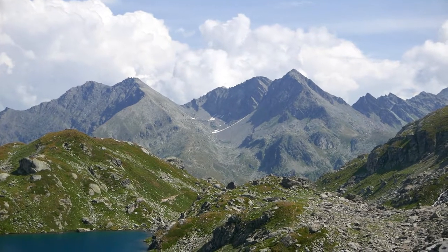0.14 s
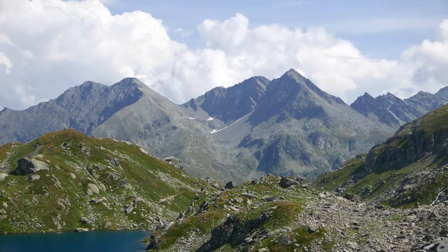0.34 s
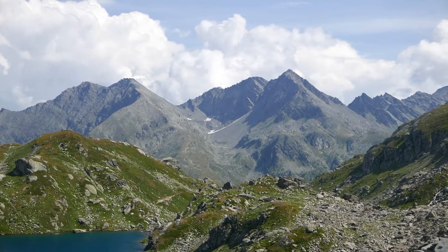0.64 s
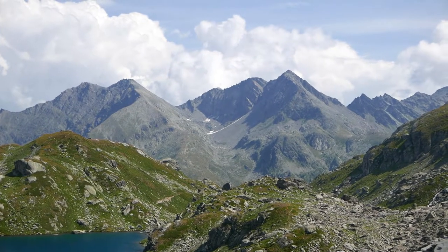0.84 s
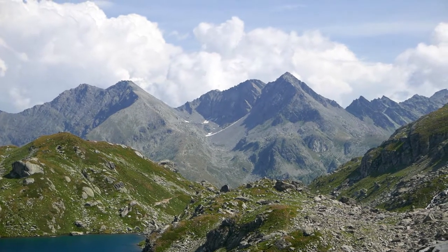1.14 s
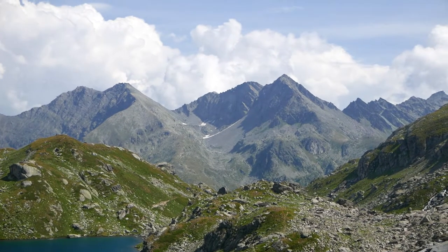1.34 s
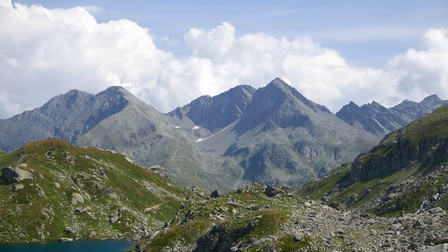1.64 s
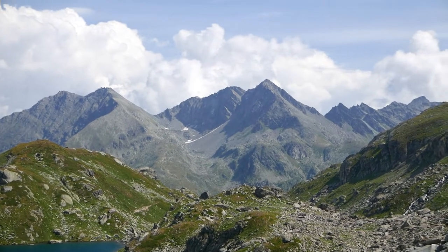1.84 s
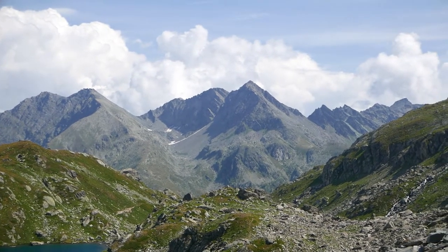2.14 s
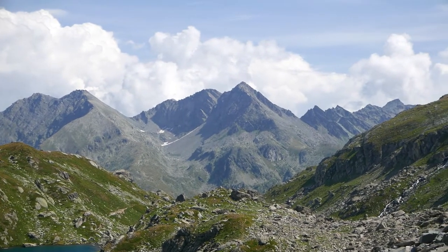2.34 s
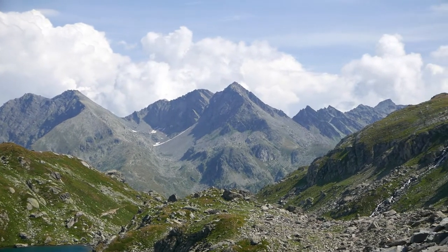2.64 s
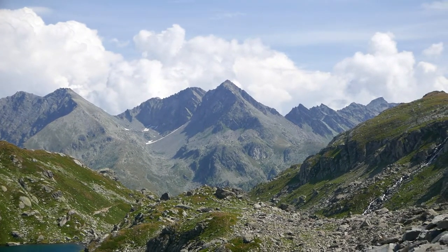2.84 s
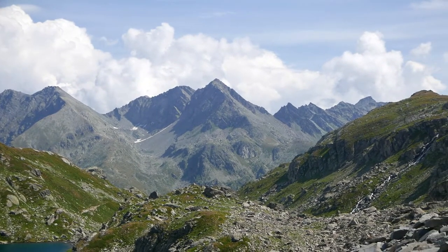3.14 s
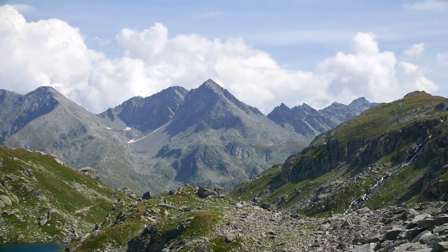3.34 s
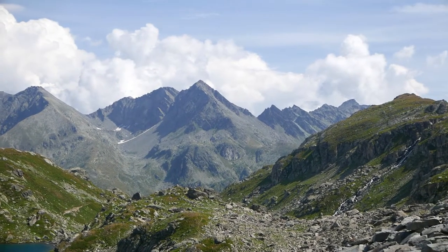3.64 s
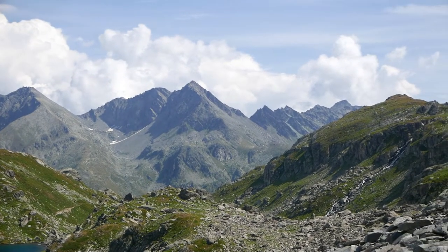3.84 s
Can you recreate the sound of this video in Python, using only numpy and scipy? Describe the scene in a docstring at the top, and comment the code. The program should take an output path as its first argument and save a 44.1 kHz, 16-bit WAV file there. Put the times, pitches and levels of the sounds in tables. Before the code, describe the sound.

Wind buffeting an open-air microphone in low irregular thumps over a steady distant mountain rush

```python
"""Distant wind and running water rush steadily across an open mountain basin, as flickering octave noise bands.
A thin electronic tone and a faint rumble lie beneath, and a lens motor ticks as short noise bursts.
Eddies thump singly on the left or right microphone port: brief low sines with overtones and turbulence.
The camera housing clicks near 0.3 s and 3.2 s, as ringing modes with a crack of noise."""
import sys
import numpy as np
from scipy import signal
from scipy.fft import rfft, irfft
from scipy.io import wavfile
from scipy.ndimage import uniform_filter1d

SR = 44100
rng = np.random.default_rng(int(sys.argv[2]) if len(sys.argv) > 2 else 0)


def decibels_to_gain(level_db):
    """Convert a level in decibels to a linear amplitude gain (20 dB per decade)."""
    exponent = np.asarray(level_db, float) / 20
    return 10 ** exponent


def log_audio(samples):
    """Write samples as a 16-bit WAV file to the path given in sys.argv[1]."""
    # one column per channel
    frames = np.atleast_2d(samples).T
    # limit to full scale, then quantise
    limited = np.clip(frames, -1, 1)
    pcm = np.round(limited * 32767).astype(np.int16)
    wavfile.write(sys.argv[1], SR, pcm)


N = 176400

# Spectrum of the distant rush, relative: f/Hz, level/dB per Hz
RUSH_SPECTRUM = [(25, -38), (60, -20), (100, -36), (180, -12), (280, -0.5), (420, -3.5), (700, -0.5),
                 (1000, -4.5), (1500, -6.5), (2000, -14), (2600, -14.5), (3600, -23.5), (5000, -29.5),
                 (7000, -25.5), (9500, -27), (12500, -29.5), (15700, -34.5)]
# Slow swell added to the rush level: t/s, level/dB
RUSH_SWELL = [(0, -1.5), (1.3, 0.5), (4, 0)]
# Share of the rush common to both sides: f/Hz, share/0-1
RUSH_LIKENESS = [(60, 0.7), (300, 0.96), (650, 0.85), (1300, 0.47), (3000, 0.43), (7000, 0.31),
                 (15000, 0.6)]
# Balance of the rush, left over right: f/Hz, level/dB
RUSH_BALANCE = [(200, -0.5), (400, -1.5), (700, -3.5), (1290, 1.5), (2380, 4.5), (4400, 2), (8100, 0),
                (15000, 0)]
# Phase lead of the left side in the common rush: f/Hz, phase/rad
RUSH_LEAD = [(300, 0.087), (1380, 0.8), (2410, 0.37), (5000, .1)]
# Weak flutter on both ports, around which each port wavers: t/s, level/dB
FLUTTER = [(0, -60), (.36, -50), (.44, -65), (.6, -71.5), (1.2, -71), (1.3, -61), (2.2, -57.5),
           (3.3, -47.5), (3.37, -60), (3.45, -42.5), (3.63, -52.5), (4, -61)]
# Motor ticks, before the stereo balance: t/s, peak level/dB
TICKS = [(0.0643, -52), (0.104, -41.5), (0.2247, -49.5), (0.383, -45), (0.4271, -45.5), (0.5842, -45.5),
         (0.6649, -53), (0.7036, -41), (0.9037, -44.5), (0.9807, -44), (1.023, -45.5), (1.0645, -51),
         (1.105, -42), (1.1852, -46), (1.2251, -46), (1.305, -48), (1.3865, -46), (1.584, -48),
         (1.6701, -50), (1.712, -54), (1.7833, -46.5), (1.9043, -47), (2.164, -48), (2.205, -55)]
# Tone colour of a tick, relative: f/Hz, level/dB per Hz
TICK_COLOUR = [(1900, -25), (2600, 7.5), (3300, -5), (4500, -0.5), (5700, -8.5), (7500, -30)]
# Eddies, before the low cut: t/s, peak level/dB, mean f/Hz, length/ms, port/0 left 1 right
EDDIES = [(0.106, -29, 202.6, 13.4, 0), (0.227, -32, 225, 7.1, 0), (0.235, -32, 206, 13.6, 1),
          (0.259, -40, 177.4, 24, 0), (0.355, -24.5, 185, 10.3, 0), (1.261, -34, 200.6, 23, 0),
          (1.374, -31, 172, 10, 0), (1.396, -8.5, 273, 8.3, 0), (1.422, -24, 221, 41, 1),
          (1.447, -18.5, 195, 13.5, 1), (1.45, -17, 213, 8.5, 0), (1.465, -20.5, 300, 7.3, 0),
          (1.499, -19.5, 232.2, 8.9, 0), (1.518, -30, 241, 15, 0), (1.533, -24, 250, 8.6, 0),
          (1.554, -20, 282, 8.7, 0), (1.565, -36, 190, 7.3, 0), (1.634, -35.5, 179.5, 20, 0),
          (1.657, -28, 193, 18, 1), (1.703, -37, 191, 21, 1), (1.755, -17, 231.6, 7, 0),
          (1.798, -27.3, 206, 16, 0), (1.848, -29.5, 177.6, 16, 0), (1.868, -27, 195.4, 6.6, 1),
          (1.917, -24.5, 202.3, 25, 1), (1.939, -27, 184.7, 12, 1), (1.975, -27.9, 191, 15, 0),
          (2.074, -21, 175.1, 10.7, 0), (2.084, -35, 137.6, 19, 1), (2.146, -37, 177, 27, 1),
          (2.147, -36, 175, 25, 0), (2.234, -30.5, 183.3, 14, 1), (2.304, -23.5, 210.7, 10.6, 0),
          (2.307, -31.5, 283, 15, 1), (2.371, -22.5, 194, 8.6, 0), (2.38, -23.5, 189, 6.7, 1),
          (2.395, -36, 152, 23, 0), (2.416, -31, 217.6, 7.2, 0), (2.425, -35, 200.3, 52, 1),
          (2.472, -23, 191.3, 12, 1), (2.533, -24, 161, 37, 1), (2.595, -24.5, 241, 11.4, 1),
          (2.604, -30, 215, 36, 1), (2.66, -23, 198.8, 12, 0), (2.689, -14, 222, 10.6, 0),
          (2.7, -27.5, 199.5, 16, 1), (2.791, -23, 172.9, 20, 1), (2.828, -33, 230, 15, 0),
          (2.838, -24, 180, 14, 1), (2.935, -38.5, 175.5, 20, 0), (3.006, -21, 205.7, 14.7, 0),
          (3.042, -28, 218, 22, 0), (3.166, -34.5, 138, 11, 0), (3.19, -35, 192, 38, 1),
          (3.246, -17, 233.4, 19.6, 0), (3.251, -20.5, 219.9, 20, 1), (3.272, -33, 202.4, 53, 1),
          (3.301, -17.5, 199.4, 11, 0), (3.434, -27.5, 274, 7.2, 0), (3.467, -21, 174.2, 21, 0),
          (3.477, -11, 217, 5, 1), (3.533, -31.5, 224, 15.9, 0), (3.546, -11.5, 292.9, 15.4, 1),
          (3.595, -26, 184.2, 8.1, 0), (3.601, -22, 259, 11, 1), (3.704, -29.5, 194, 9.4, 0),
          (3.727, -14, 225.4, 11, 0), (3.784, -13, 212, 7.6, 0), (3.806, -12, 191.9, 15, 0),
          (3.814, -20, 216, 63, 1), (3.846, -22.5, 193, 36, 0), (3.902, -31.5, 220.2, 19, 0),
          (3.936, -36, 233.5, 12, 0)]
# Spectrum of port turbulence, relative: f/Hz, level/dB per Hz
TURBULENCE_SPECTRUM = [(40, -9), (70, -9.5), (110, 3), (200, 1.5), (300, -4), (420, -9.5), (700, -33),
                       (1200, -42), (2500, -80)]
# Housing clicks: t/s, ring peak level/dB, crack peak level/dB, crack top f/Hz
CLICKS = [(0.266, -51, -48, 6000), (0.2845, -35.5, -38, 15500), (0.292, -45, -48, 9000),
          (0.2975, -49, -50, 5000), (3.217, -34.5, -42.5, 7000)]
# Ringing modes of the housing, before each hit's scatter: f/Hz, relative level/dB, t60/s
CLICK_MODES = [(1800, -14, .008), (2400, -8, .012), (2850, 0, .011), (2750, -16, .07), (3300, -8, .008)]
# Tone colour of a click's crack, relative: f/Hz, level/dB per Hz
CRACK_COLOUR = [(2200, -30), (3200, -4), (4900, 0), (6500, -8), (9000, -6), (11000, -17), (13300, -10)]
# Narrow dips of the microphone path: centre f/Hz, half-width to 1/e of depth f/Hz, level/dB
DIPS = [(471.3, 30.5, -13.5), (6720, 120, -9.5), (7390, 226, -13.5), (7830, 236, -14.5), (8530, 290, -10)]

RUSH_DB, FLICKER_DB, FLICKER_RATE_HZ = -49, 1.13, 9.18  # rms before swell; spread and rate per octave
WHINE_HZ, WHINE_DB, WHINE_WANDER_DB = 15625, -93, 3.0
RUMBLE_DB, RUMBLE_KNEE_HZ = -80, 35
FLUTTER_DEPTH_DB = 6.5
TICK_T60_S, TICK_LEFT_DB = 0.012, 1
BURST_RISE_S = .001  # onset of ticks and cracks
EDGE_DB, RISE_SHARE = -19.5, 0.97  # fall at an eddy's ends; rise length over fall length
WANDER = .06  # spread of the eddy pitch, as a share
SKIRT_DB, SKIRT_SLOPE, SKIRT_KNEE_DB = -33, .8, -20  # turbulence; its dB per dB of eddy below the knee
SKIRT_RISE_MS, SKIRT_MS, GRAIN_DB = 6.1, 11, 3.1  # time constants in and out; spread of the grain
SNAP_DB, SNAP_HZ, SNAP_TOP_HZ, SNAP_MS = 8, 400, 800, 10  # overtone gain, band, length that halves the drive
WIND_CUT_HZ, CUT_FLOOR_DB, PORT_LEAK_DB = 76.6, -35.5, -13.5  # low cut, what bypasses it, leak across
CLICK_MS, CLICK_SCATTER_DB, CLICK_DETUNE = 2.2, 2, .02  # contact time; spread of mode levels and tuning
CRACK_T60_S = .016


def read(table, hz):
    """Table value on a log-frequency axis."""
    f, v = np.array(table, float).T
    return np.interp(np.log(np.maximum(hz, 1)), np.log(f), v)


def colour(x, gain):
    """Filter by a gain that depends on frequency."""
    return irfft(rfft(x) * gain(np.fft.rfftfreq(N, 1 / SR)), N)


def unit(x):
    """Scale to rms 1."""
    return x / np.sqrt(np.mean(x ** 2))


def walk(rate):
    """Random levels held 1 / rate s and slewed twice; spread 1."""
    hold = int(SR / rate)
    steps = np.repeat(rng.standard_normal(N // hold + 1), hold)
    return unit(uniform_filter1d(uniform_filter1d(steps, hold), hold)[:N])


def curve(table):
    """Control curve in time."""
    return np.interp(np.arange(N) / SR, *np.array(table, float).T)


def noise_bursts(rows, spectrum, t60_s):
    """A short burst of coloured noise at every row (t/s, level/dB, top f/Hz), a little unlike left and right."""
    t, out = np.arange(2048) / SR, np.zeros((2, N))
    hz = np.fft.rfftfreq(len(t), 1 / SR)
    shape = np.minimum(t / BURST_RISE_S, 1) * decibels_to_gain(-60 * t / t60_s)
    for (s, db, top_hz), noise in zip(rows, rng.standard_normal((len(rows), 3, len(t)))):
        stereo = noise[0] + noise[1:] / 2
        gain = decibels_to_gain(read(spectrum, hz)) / (1 + (hz / top_hz) ** 10)
        burst = shape * irfft(rfft(stereo) * gain)
        start = int(s * SR)
        out[:, start:start + len(t)] += decibels_to_gain(db) * burst / abs(burst).max()
    return out


def rush():
    """Distant wind and water: octave noise bands with a slight flicker, partly alike left and right."""
    hz, out = np.fft.rfftfreq(N, 1 / SR), 0
    common, left_own, right_own = rfft(rng.standard_normal((3, N)))
    like = np.clip(read(RUSH_LIKENESS, hz), 0, 1)
    half_lead = np.exp(.5j * read(RUSH_LEAD, hz))
    half_balance = decibels_to_gain(read(RUSH_BALANCE, hz) / 2)
    left = (np.sqrt(like) * common * half_lead + np.sqrt(1 - like) * left_own) * half_balance
    right = (np.sqrt(like) * common / half_lead + np.sqrt(1 - like) * right_own) / half_balance
    both = np.array([left, right]) * decibels_to_gain(read(RUSH_SPECTRUM, hz))
    octave = np.log2(hz + 1)
    for centre in range(4, 15):
        share = np.cos(np.pi / 2 * np.clip(octave - centre, -1, 1))
        out = out + irfft(both * share ** 2, N) * decibels_to_gain(FLICKER_DB * walk(FLICKER_RATE_HZ))
    return unit(out) * decibels_to_gain(RUSH_DB + curve(RUSH_SWELL))


def whine():
    """Thin electronic tone: a steady sine whose level wanders slowly."""
    level = decibels_to_gain(WHINE_DB + WHINE_WANDER_DB * walk(2))
    return level * np.sin(2 * np.pi * WHINE_HZ * np.arange(N) / SR)


def rumble():
    """Faint sub-bass of the electronics: low-passed noise, independent left and right."""
    noise = rng.standard_normal((2, N))
    return unit(colour(noise, lambda hz: 1 / (1 + (hz / RUMBLE_KNEE_HZ) ** 4))) * decibels_to_gain(RUMBLE_DB)


def flutter_level():
    """Level of the weak flutter, wavering separately on each port."""
    waver = np.array([walk(30.13), walk(30)])
    return decibels_to_gain(curve(FLUTTER) + FLUTTER_DEPTH_DB * waver)


def motor_ticks():
    """Lens motor: dry bursts of coloured noise, leaning slightly left."""
    ticks = noise_bursts([(s, db, SR) for s, db in TICKS], TICK_COLOUR, TICK_T60_S)
    return ticks * decibels_to_gain(np.array([[.5], [-.5]]) * TICK_LEFT_DB)


def eddies():
    """Each eddy is a few wandering cycles on one port, with a drive for overtones and a skirt of turbulence."""
    t = np.arange(N) / SR
    thumps, drive, skirt = np.zeros((3, 2, N))
    warped_t = np.cumsum(1 + WANDER * walk(90)) / SR
    for (s, db, hz, ms, port), turn in zip(EDDIES, rng.random((len(EDDIES), 1))):
        near = slice(max(int((s - .12) * SR), 0), int((s + .12) * SR))
        off_ms = (t[near] - s) * 1000
        rising = off_ms < 0
        side = int(port > .5)
        edge = (2 * off_ms / ms / np.where(rising, RISE_SHARE, 1)) ** 2
        thump = decibels_to_gain(db + EDGE_DB * edge) * np.sin(2 * np.pi * (hz * warped_t[near] + turn))
        thumps[side, near] += thump
        drive[side, near] += thump / (1 + (ms / SNAP_MS) ** 4)  # short eddies snap most
        outside_ms = np.maximum(abs(off_ms) - ms / 2, 0)
        fade = np.exp(-outside_ms / np.where(rising, SKIRT_RISE_MS, SKIRT_MS))
        skirt[side, near] += decibels_to_gain(SKIRT_DB + SKIRT_SLOPE * min(db - SKIRT_KNEE_DB, 0)) * fade
    return thumps, drive, skirt


def snap(drive):
    """Squaring the eddy wave makes overtones that grow faster than the eddy itself."""
    def band(hz):
        return 1 / (1 + (SNAP_HZ / (hz + 1)) ** 6) / (1 + (hz / SNAP_TOP_HZ) ** 10)
    return colour(drive * abs(drive) + 2 * drive ** 2, band) * decibels_to_gain(SNAP_DB)


def wind_on_ports():
    """Eddies, overtones and turbulence pass a steep low cut; some leaks across the ports."""
    thumps, drive, skirt = eddies()
    grain = decibels_to_gain(GRAIN_DB * np.array([walk(70), walk(70)]))
    noise = rng.standard_normal((2, N))
    turbulence = unit(colour(noise, lambda hz: decibels_to_gain(read(TURBULENCE_SPECTRUM, hz))))
    ports = thumps + snap(drive) + (skirt * grain + flutter_level()) * turbulence
    cut = signal.butter(5, WIND_CUT_HZ, "highpass", fs=SR, output="sos")
    ports = signal.sosfilt(cut, ports) + decibels_to_gain(CUT_FLOOR_DB) * ports
    return ports + decibels_to_gain(PORT_LEAK_DB) * ports[::-1]


def housing_ring():
    """A soft contact builds up the housing modes; each hit has its own balance and tuning."""
    t, out = np.arange(2048) / SR, np.zeros(N + 4096)
    hz, level_db, t60 = np.array(CLICK_MODES, float).T[:, :, None]
    rise = np.sin(np.pi / 2 * np.clip(t * 1000 / CLICK_MS, 0, 1)) ** 2
    decay_db = -60 * np.maximum(t - CLICK_MS / 1000, 0) / t60
    draws = rng.standard_normal((len(CLICKS), 3, len(CLICK_MODES), 1))
    for (s, db, _, _), (turn, scatter, detune) in zip(CLICKS, draws):
        ring = decibels_to_gain(level_db + CLICK_SCATTER_DB * scatter + decay_db)
        modes = ring * np.sin(2 * np.pi * (hz * (1 + CLICK_DETUNE * detune) * t + turn))
        hit = rise * np.sum(modes, axis=0)
        start = int(s * SR)
        out[start:start + len(t)] += decibels_to_gain(db) * hit / abs(hit).max()
    return out[:N]


def housing_clicks():
    """Ringing modes in the centre, with a crack of noise on every contact."""
    crack_rows = [(s, db, top_hz) for s, _, db, top_hz in CLICKS]
    return housing_ring() + noise_bursts(crack_rows, CRACK_COLOUR, CRACK_T60_S)


def scene():
    """Rush, wind on the ports and the camera's own noises."""
    camera = whine() + rumble() + motor_ticks() + housing_clicks()
    return rush() + wind_on_ports() + camera


def microphone_path(dry):
    """Narrow dips in the response of the microphone path."""
    def dips(hz):
        return decibels_to_gain(sum(db * np.exp(-((hz - f) / w) ** 2) for f, w, db in DIPS))
    return colour(dry, dips)


def low_pass(x):
    """Removes everything above the highest recorded frequency."""
    return signal.sosfilt(signal.butter(12, 15850, fs=SR, output="sos"), x)


def record(dry):
    """The finished mix, heard through the microphone path."""
    mix = microphone_path(dry)
    return low_pass(mix)


dry = scene()
out = record(dry)
log_audio(out)
```